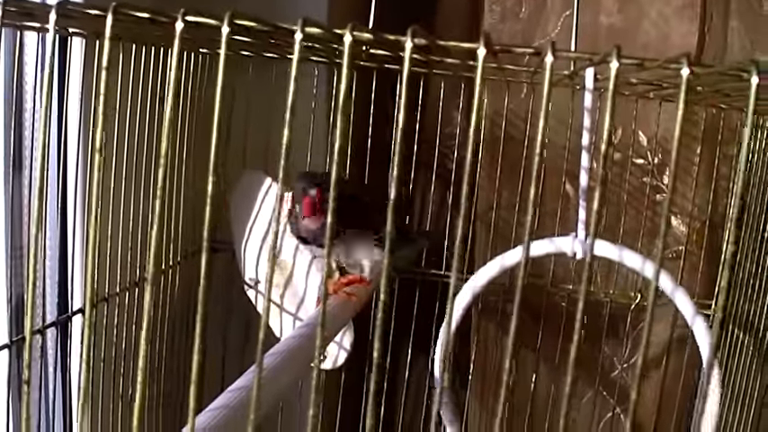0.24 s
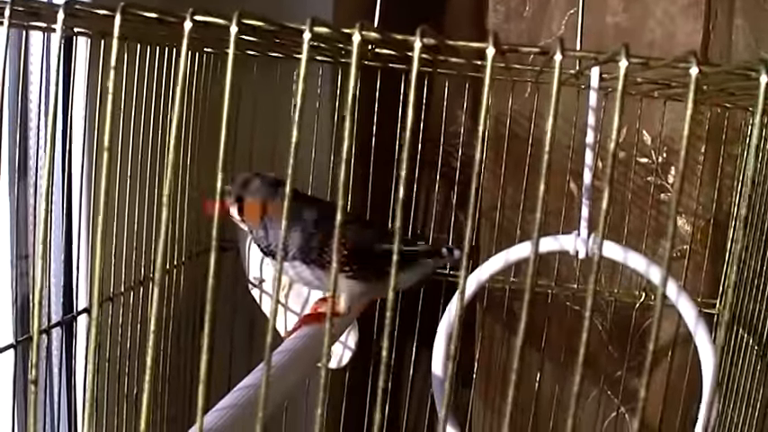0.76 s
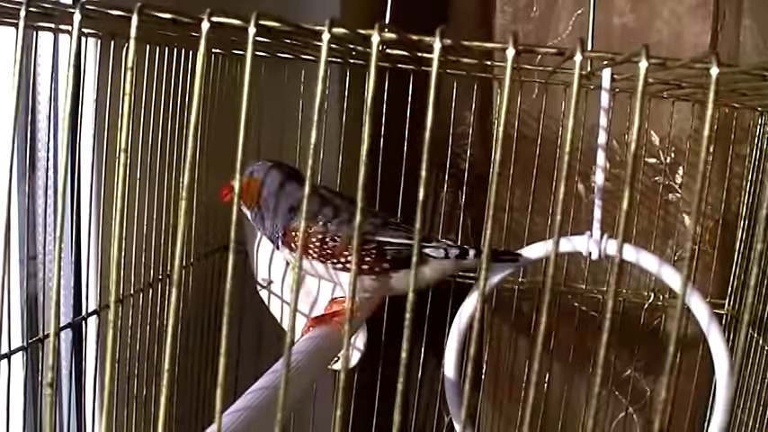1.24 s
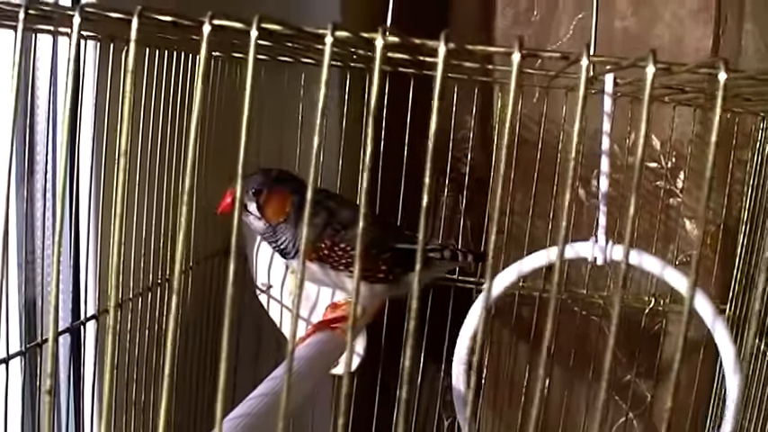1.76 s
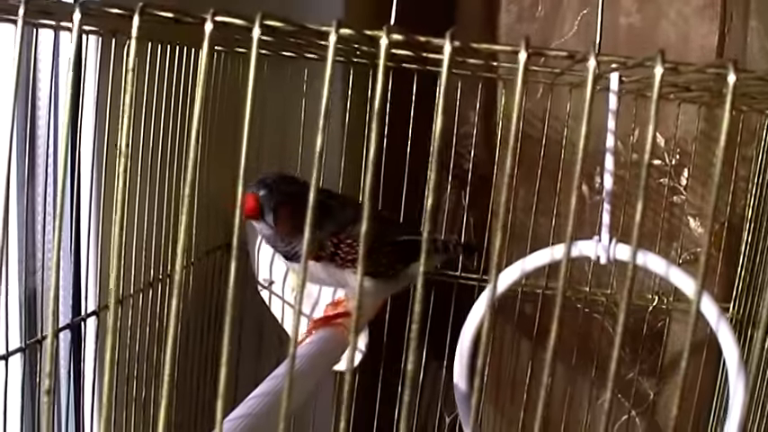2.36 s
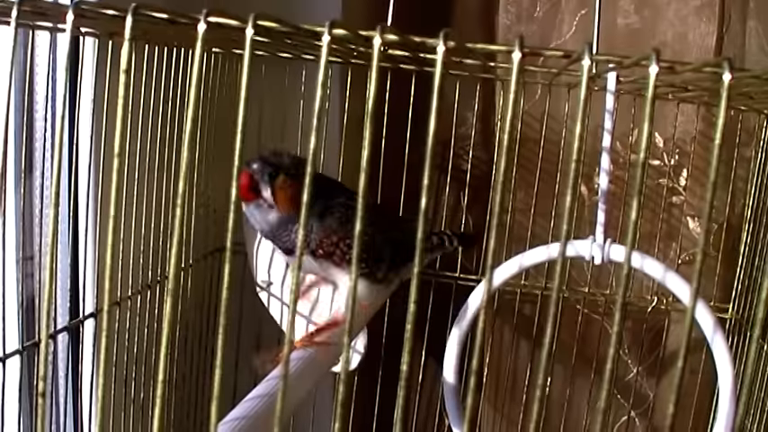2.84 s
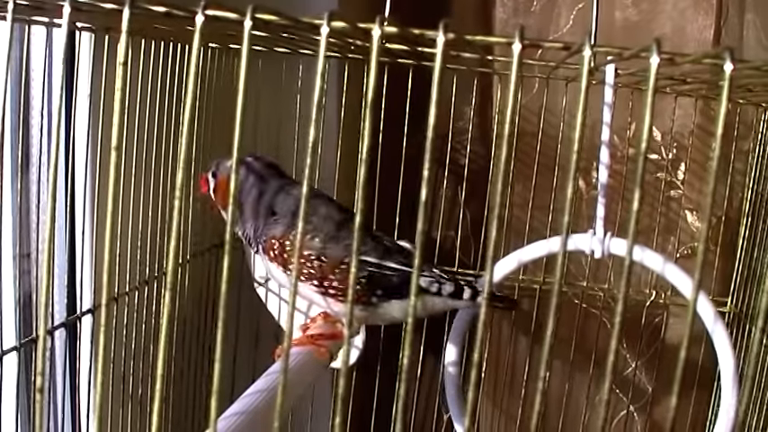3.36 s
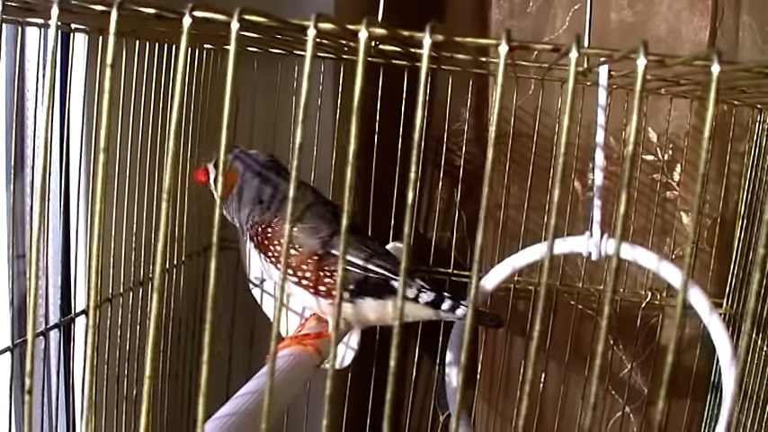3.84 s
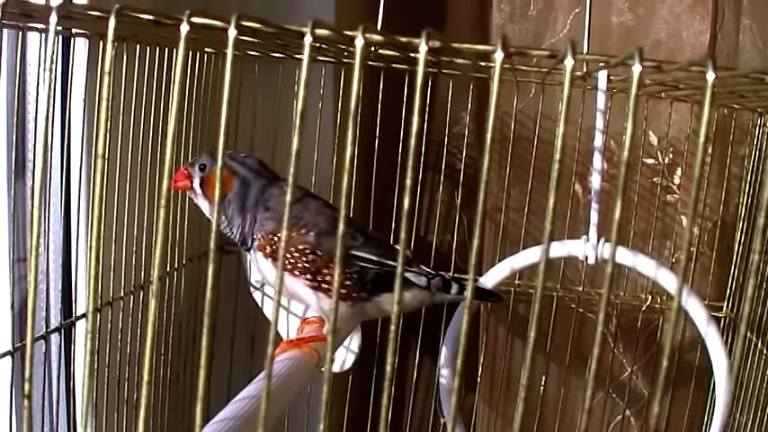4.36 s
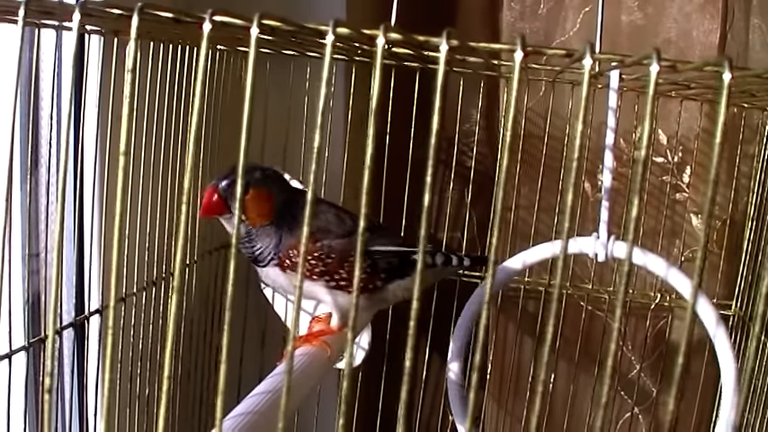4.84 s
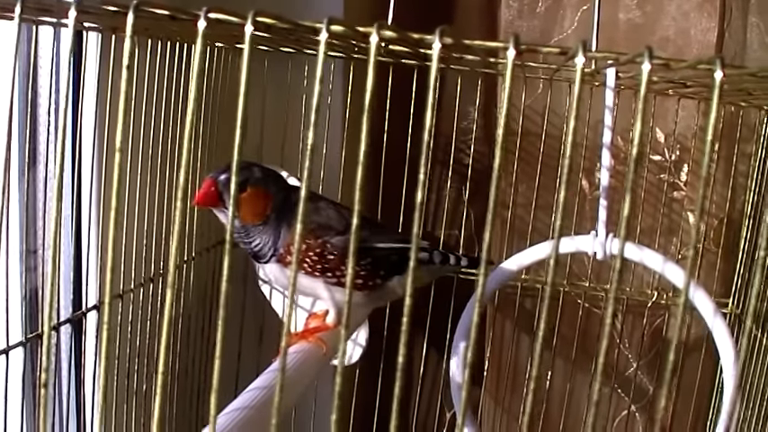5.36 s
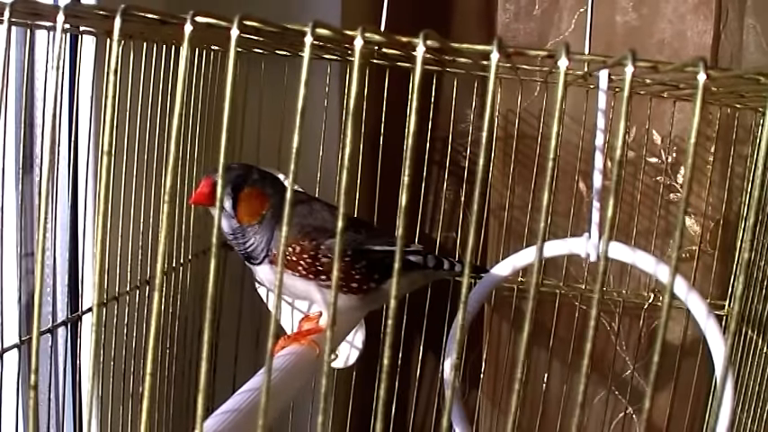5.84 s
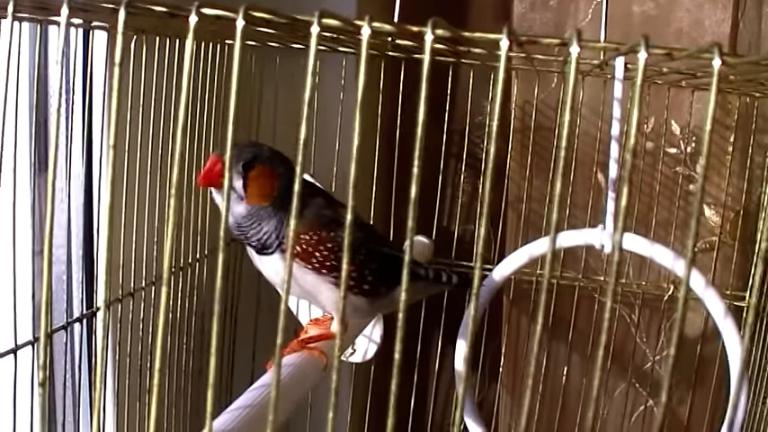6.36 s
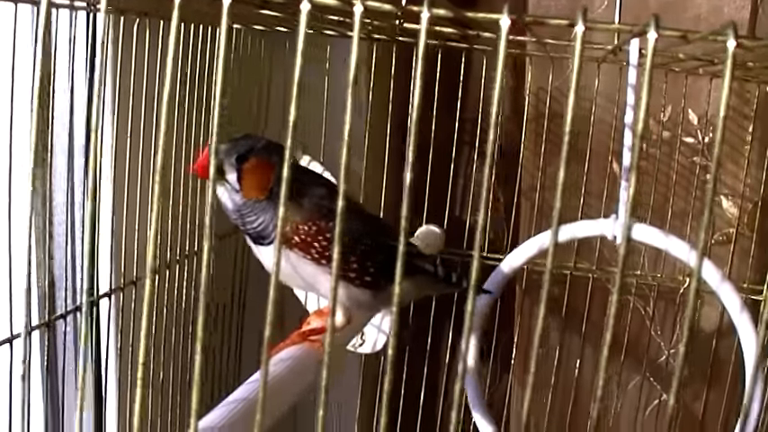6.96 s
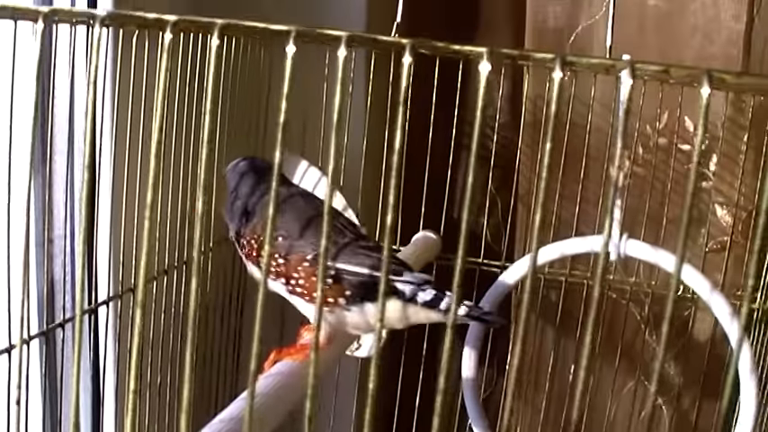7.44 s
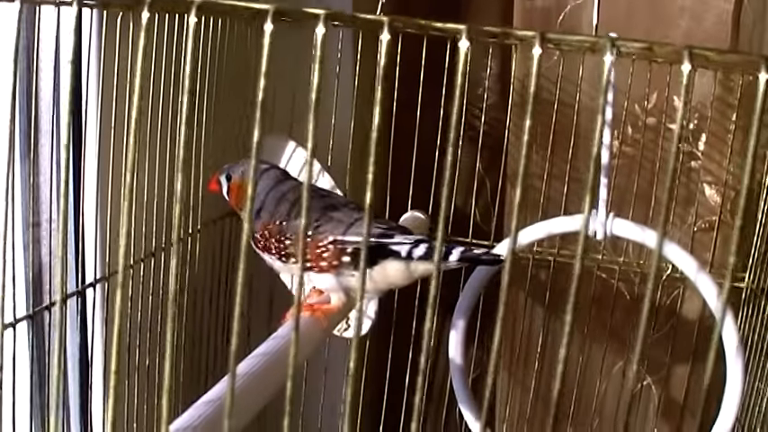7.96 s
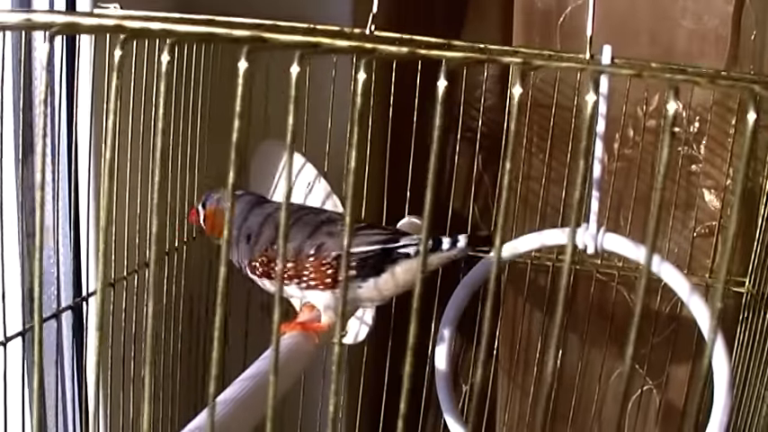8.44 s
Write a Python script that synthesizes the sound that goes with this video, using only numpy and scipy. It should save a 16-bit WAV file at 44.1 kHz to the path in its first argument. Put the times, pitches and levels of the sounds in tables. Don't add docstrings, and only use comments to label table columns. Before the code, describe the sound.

Close zebra-type finch honks like a tiny reedy toy horn, bursts into fast chattering song, calls again, then flutters and taps the cage in a quiet room.

```python
import sys
import numpy as np
from scipy import signal
from scipy.fft import rfft, irfft
from scipy.io import wavfile
from scipy.ndimage import uniform_filter1d

SR = 44100
rng = np.random.default_rng(int(sys.argv[2]) if len(sys.argv) > 2 else 0)


def to_wav(s):
    ch = np.atleast_2d(s).T
    pcm = np.round(np.clip(ch, -1, 1) * 32767)
    wavfile.write(sys.argv[1], SR, pcm.astype(np.int16))


def ratio(d):
    e = np.asarray(d, float) / 20
    return 10 ** e


N = 384111
FREQ = np.fft.rfftfreq(N, 1 / SR)


def on_log(table, hz):
    table = np.array(table, float)
    return np.interp(np.log(np.maximum(hz, 1)), np.log(table[:, 0]), table[:, 1])


def unit(x):
    return x / np.sqrt(np.mean(x ** 2))


def hump(hz, centre_hz, width_hz):
    return 1 / (1 + (2 * (hz - centre_hz) / width_hz) ** 2) ** 2


def band(count, centre_hz, width_hz):
    gain = np.sqrt(hump(np.fft.rfftfreq(count, 1 / SR), centre_hz, width_hz))
    return unit(irfft(rfft(rng.standard_normal(count)) * gain, count))


def walk(shape, rate):
    k = max(int(SR / rate), 1)
    x = uniform_filter1d(uniform_filter1d(rng.standard_normal(shape), k), k)
    return x / x.std()


def add(out, start_s, x):
    i = int(start_s * SR)
    out[i:i + len(x)] += x[:N - i]


def puffs(table, grain_db):
    out = np.zeros(N)
    for start_s, length_s, db, hz, width_hz in table:
        n = int(length_s * SR)
        swell = np.sin(np.pi * np.sqrt(np.arange(n) / n))
        crumble = ratio(grain_db * walk(n, 350))
        add(out, start_s, ratio(db) * swell * crumble * band(n, hz, width_hz))
    return out


# (time from start [s], pitch [Hz], level [dB],
# throat resonance [Hz], beak share [dB], rasp [0-1], neck [dB]).
SWEEP = [(0, 438, -24, 2900, -2.5, 0, 1.5), (.005, 556.8, -13, 2916, 4.5, 0.5, 6.5),
         (.0095, 642, -6, 3200, 4, .7, 0), (.012, 1290, -3.5, 2931, 3, 0.3, -3.5),
         (.023, 1337, -2.5, 3124, 1.5, 0.03, -5), (.042, 1382, -3, 3350, -1, 0, -7),
         (.058, 1379, -4, 3385, -3.5, 0, -6), (.069, 1354, -4, 3406, -2, 0, -6),
         (.072, 1333, -2, 3500, -6, 0.33, -5.5), (.084, 1202, -2, 3411, -9.5, .3, -7.5),
         (.090, 1135, -7, 3500, -9.5, 0.32, -10), (.105, 932, -4, 3314, -6, 0, -4),
         (.140, 720.7, -6, 3276, -8.5, .14, -2.5), (.153, 619.3, -17.5, 3414, -14, 0.3, 5)]
HOLD = [
    (0, 408, -21.5, 3800, 1.5, .2, -0.5),
    (.005, 572, -9.5, 3460, 8.5, .2, 0),
    (.0095, 640, -5, 3400, 7, .6, -3),
    (.012, 1286, 0.5, 3126, 5.5, 0.2, -6),
    (.035, 1328, -1, 3437, -4.5, 0.0015, -5.5),
    (.060, 1343, -2, 3450, 0, 0, -9),
    (.090, 1334, -2.5, 3496, -4.5, .02, -4.5),
    (.125, 1313, -3.5, 3310, -1, 0, 6.5),
]
DROOP = [
    (.148, 1271, -3, 3400, -10.5, .02, 1.7),
    (.155, 1216, -25.5, 3400, 1, 0.038, 2.6),
]
BREAK = [
    (.131, 1318, -5.5, 3400, -12, 0.044, 7.6),
    (.140, 1262, -1, 3280, -14, 0.18, 9),
    (.147, 1170, -9.5, 3500, -14, .5, 4),
    (.157, 950, -24.5, 3170, -26, 0.91, 4.9),
]
FINAL = [(0, 420.4, -22, 3800, 0, .3, -1), (.005, 570, -15, 3600, 14, 0.5, -6),
         (.012, 1261, -4.5, 3400, -4.5, 0.17, -2), (.030, 1284, -0.5, 3380, -6, 0, 4.5),
         (.042, 1308, -2, 3600, -8.5, 0, 2), (.080, 1322, 0.5, 3670, -23.5, 0, -7),
         (.118, 1307, -2.5, 3670, -18.5, 0.045, 2), (.126, 1300, -7.5, 3400, -7.5, 0, 10.5),
         (.150, 1275, -3.5, 3400, -7, .05, 8.5), (.158, 1234, -1.5, 3370, -17, 0.44, 2.5),
         (.166, 1180, -17.5, 3500, -10, 0.88, -6), (.180, 940, -28, 3200, -23, 0.83, 10)]
INTRO = [
    (0, 579.6, -19, 3250, -2, 0.66, 0.96),
    (.010, 585, -0.5, 2903, -3, 0.45, 0.99),
    (.025, 460, -2, 3000, -16.5, .15, 1),
    (.040, 372.8, -26, 2896, -16.5, 0.23, 1),
]
TET = [
    (0, 476, -10.5, 3318, -3, 0.28, 1.8),
    (.008, 500, 0.5, 3570, -3, 0.17, 1.1),
    (.020, 510.5, -0.5, 3490, -7, 0.046, 4),
    (.034, 475, -11.5, 3200, -16, .1, 4),
    (.045, 397, -24, 3464, -20, .3, 4),
]
CHIRP = [
    (0, 453, -1.5, 3240, 5, 0.37, 5.3),
    (.008, 486, -4, 3270, -4, 0.123, 2.5),
    (.018, 492, 3, 3430, -4, .04, 2.8),
    (.032, 473, -2, 3370, -5, 0.028, 3.8),
    (.040, 440, -8, 3130, -22, 0.078, 7),
    (.048, 403, -23, 3000, -15, .3, 12.3),
]
STACK = [
    (0, 423.8, -16.5, 2820, 0, 0.49, 1),
    (.012, 559, 1, 3417, -13.5, 0.183, -9),
    (.025, 577.6, 0.5, 3400, 1.5, 0.044, 1.5),
    (.058, 573.2, 1.5, 3326, -8, 0.092, -7),
    (.064, 520, -6, 3300, -24.5, .15, -1),
    (.072, 413, -15.5, 3680, -22.5, 0.4, 5.5),
]
BUZZ = [
    (0, 504.7, -3.5, 3484, -10.5, 0.3642, -28.5),
    (.006, 503.8, -1.5, 3590, -0.5, 0.202, -29.5),
    (.024, 478, -9.5, 3050, 2, .12, -21.5),
    (.030, 874, -12, 3504, 2, 0.767, 6),
    (.048, 781.5, -14, 3200, 3, 0.878, -3),
    (.051, 985.6, -12.5, 3400, 2.5, 1, -3),
    (.068, 830, -16, 3400, 0, .6, 8),
    (.082, 670, -16.5, 3310, -22.5, 0.15, 5),
    (.100, 518, -26, 2800, -28.5, 0.25, 7.5),
]
SLIDE = BUZZ[:4] + [(.050, 800.4, -12.5, 3100, 1, 1, 1), (.068, 740, -15, 3400, -1, .7, 1),
         (.082, 650, -17, 3400, -17, .15, 2), (.100, 519.7, -27, 2800, -26, .25, 0)]
VOICES = {
    "slide": (SLIDE, 5600, 7100), "sweep": (SWEEP, 4580, 6300), "hold": (HOLD, 4600, 6900),
    "break": (HOLD, 4700, 6900), "final": (FINAL, 4970, 7200), "intro": (INTRO, 5400, 7600),
    "tet": (TET, 4930, 9500), "chirp": (CHIRP, 4540, 14400), "stack": (STACK, 4686, 9700),
    "buzz": (BUZZ, 5750, 7100),
}


def sing(kind, start_s, length_s, top_hz, level_db, away_db):
    shape, clear_hz, rasp_hz = VOICES[kind]
    ending = {"hold": DROOP, "break": BREAK}.get(kind, [])
    s, hz, db, throat, beak_db, rasp, neck_db = np.transpose(shape + ending)
    attack_s = .012
    stretch = (length_s - attack_s) / (s[-1] - attack_s)
    s = np.where(s > attack_s, attack_s + (s - attack_s) * stretch, s)
    pitch = hz * top_hz / hz.max()
    throat = throat + 45.5 * away_db
    beak = clear_hz + (rasp_hz - clear_hz) * np.clip(rasp, 0, 1)
    neck_db = neck_db + 0.21 * away_db
    return np.transpose([start_s + s, pitch, db + level_db, throat, beak, beak_db - away_db, rasp, neck_db])


# (frequency [Hz], level [dB])
LEAK = [(400, -22), (1000, -17), (1600, -31), (2200, -28.5), (7000, -28.5), (8000, -27), (9000, -28.5),
        (10400, -24.5), (12000, -41), (14300, -51)]
TRACT_WIDTH_HZ = 1305


def syllable(rows, jitter=.018, shimmer_db=1.2, scatter=2.0, hiss=.015):
    s, *columns = np.transpose(rows)
    columns[1] = ratio(columns[1])
    t = np.arange(s[0], s[-1], 1 / SR)
    hz, level, throat, beak, beak_db, rasp, neck_db = (np.interp(t, s, c) for c in columns)
    hz = uniform_filter1d(hz, size=150, mode="nearest")
    glide = np.abs(np.gradient(np.log(hz))) * SR
    rasp = np.clip(rasp + np.minimum(.007 * glide, .2), 0, 1)
    order = np.arange(1, 37)[:, None]
    partial = order * hz

    power = hump(partial, throat, TRACT_WIDTH_HZ)
    power = power + ratio(2 * beak_db) * hump(partial, beak, TRACT_WIDTH_HZ)
    power = power / (1 + (1700 / partial) ** 8) / (1 + (partial / 9000) ** 12)
    power = power * ratio(.8 * np.minimum(neck_db + 12, 0) * (order % 2))
    alternate = neck_db[0] < -12
    neck_db = (neck_db + 3.5 * walk(len(t), 86)) * (partial < 1450)
    leak = ratio(2 * (on_log(LEAK, partial) + neck_db)) * (partial < 13900)
    power = power + power.max(0) * leak
    uneven_db = shimmer_db * partial / 4000 + 2.8 * np.minimum(glide / 8, 1)
    gain = np.sqrt(power / power.sum(0)) * ratio(uneven_db * walk(partial.shape, 70))

    phase = 2 * np.pi * np.cumsum(hz * (1 + jitter * rasp * walk(len(t), 600))) / SR
    noisy = rasp ** 2 * np.minimum(0.078 + partial / 3500, 1.5) ** 2 + hiss ** 2
    noisy = np.clip(noisy, 0, 1)
    smear = (walk(partial.shape, 1200) + 1j * walk(partial.shape, 1200)) / np.sqrt(2)
    turn = np.arctan(2 * (partial - throat) / TRACT_WIDTH_HZ)
    turn = turn + np.arctan(2 * (partial - beak) / TRACT_WIDTH_HZ)
    blunt = rasp * walk(partial.shape, 68) + (0.11 + 1.3 * alternate) * rng.standard_normal(order.shape)
    spin = np.exp(1j * (order * phase - 2 * turn + scatter * blunt))
    stack = (np.sqrt(1 - noisy) + np.sqrt(noisy) * smear) * spin
    voice = np.sum(gain * stack, 0)
    voice = voice / uniform_filter1d(np.abs(voice) ** 2, size=260, mode="nearest") ** .35

    edge = np.clip(np.minimum(1.5 * (t - s[0]), s[-1] - t) / .004, 0, 1)
    beat = np.cos(2 * np.pi * np.cumsum(340 * (1 + 0.17 * walk(len(t), 130))) / SR)
    flutter = 1 + .6 * rasp * np.clip((hz - 900) / 200, 0, 1) * beat
    return np.sqrt(2) * level * edge * flutter * voice.real


# (frequency [Hz], width [Hz], loss per dB of turn [dB])
SHADOW = [(2500, 1400, 0.2), (8910, 2500, 1.5), (13400, 4500, 1.1)]


def shade(x, away_db):
    hz = np.fft.rfftfreq(len(x), 1 / SR)
    lost_db = away_db * sum(loss * hump(hz, centre, width) for centre, width, loss in SHADOW)
    behind_db = max(away_db - 4, 0) * hump(hz, 2550, 1500)
    return irfft(rfft(x) * ratio(-lost_db - behind_db), len(x))


# (time [s], centre pitch [Hz], level [dB], depth of the shake [Hz])
TRILL = [
    (3.8054, 5510, -46.5, -1.5),
    (3.806, 5150, -20, -2.5),
    (3.809, 4920, -21, -6),
    (3.815, 4845, -32.5, -3.5),
    (3.817, 4766, -21, -6),
    (3.8205, 4852, -41, -5),
    (3.822, 3502, -27, 892.5),
    (3.854, 3210, -28.5, 935),
    (3.868, 3100, -33, 696),
]
TRILL_RATE_HZ = 191


def trill():
    s, *columns = np.transpose(TRILL)
    t = np.arange(s[0], s[-1], 1 / SR)
    hz, db, depth = (np.interp(t, s, c) for c in columns)
    shake = np.cos(2 * np.pi * TRILL_RATE_HZ * (t - 3.8268) + .5 * walk(len(t), 150))
    phase = 2 * np.pi * np.cumsum(hz + depth * shake) / SR
    swell = ratio(db + depth / 1000 * (6.3 * shake + 1.1 * walk(len(t), 400)))
    swell = swell * np.clip(np.minimum(t - s[0], s[-1] - t) / .0012, 0, 1)
    octave = ratio(-24.0) * (depth < 100) * np.sin(2 * phase)
    breath = ratio(-18.5) * depth / 1000 * band(len(t), 4900, 1200)
    return np.sqrt(2) * swell * (np.sin(phase) + octave + breath)


# (time [s], peak level [dB], frequency [Hz], length [s])
CLICKS = [
    (3.581, -21, 6700, 0.00203),
    (3.586, -11.5, 6080, 0.0024),
    (3.644, -23, 3460, 0.0033),
    (4.13, -26.5, 6400, .002),
    (4.1369, -10.5, 5700, 0.0018),
    (4.195, -22.5, 3530, 0.0036),
]


def clicks():
    out = np.zeros(N)
    for s, db, hz, length in CLICKS:
        n = int(2 * length * SR)
        spin = 2 * np.pi * hz * np.arange(n) / SR
        snap = np.sin(spin) + 0.13 * np.sin(.63 * spin)
        add(out, s - length, ratio(db) * np.hanning(n) ** 2 * snap)
    return out


SUNG = { "sweep": [(1.068, 0.15, 1371, -13.5, 7.5), (2.802, 0.15, 1365, -13, -0.5),
        (6.051, .156, 1361, -13.5, -1.5)], "hold": [(1.256, .137, 1344, -16, 7.5),
        (6.241, .146, 1352, -16.5, 1.5)], "break": [(2.986, .166, 1341, -16.5, -2)],
        "final": [(4.429, .180, 1325, -16, 0)], "intro": [(3.233, 0.04, 557, -30.5, 1),
        (3.325, 0.047, 563, -30, 3), (3.393, 0.036, 578, -30, 1), (3.937, 0.035, 648, -25, -4)],
        "chirp": [(.289, .048, 488.8, -25, -2.8)], "tet": [(4.365, 0.039, 516.3, -22.5, -5.5)],
        "stack": [(3.455, 0.075, 571.4, -25, 2.5), (4.002, .072, 572.7, -22, -1.5)],
        "buzz": [(3.646, .098, 988.6, -11.5, 0)], "slide": [(4.197, .101, 864, -12.5, -1.5)], }
# (time [s], length [s], level [dB], frequency [Hz], width [Hz])
WHISPERS = [(3.440, 0.01, -43, 6800, 915), (3.548, 0.076, -48, 7296, 605),
            (3.555, 0.043, -40.5, 3199, 1600), (3.618, 0.0089, -44, 6100, 908),
            (3.780, 0.0151, -55.5, 7110, 600), (3.865, 0.0132, -48.5, 863, 300.5),
            (3.224, 0.024, -48, 1060, 250), (3.313, 0.017, -48, 1110, 250),
            (3.387, 0.023, -51.5, 1097, 256), (3.913, 0.028, -49.5, 6800, 710),
            (3.928, 0.038, -47, 1230, 250), (4.098, 0.04, -41.5, 2900, 1650),
            (4.098, 0.055, -49, 7800, 1499)]


def finch():
    out = puffs(WHISPERS, grain_db=-4.0) + clicks()
    for kind, events in SUNG.items():
        for event in events:
            add(out, event[0], shade(syllable(sing(kind, *event)), event[-1]))
    add(out, TRILL[0][0], trill())
    return out


# (time [s], length [s], level [dB], frequency [Hz], width [Hz])
RUSTLES = [(0.01, 0.064, -64, 6700, 4890), (.25, 0.11, -63, 6070, 4000), (.375, 0.0096, -46, 8630, 2470),
           (.42, 0.087, -55.5, 6800, 5050), (.42, 0.15, -57, 853, 1330), (.675, 0.032, -57, 6780, 7060),
           (1.425, 0.11, -54, 870, 1460), (2.42, 0.035, -55.5, 6050, 8070), (2.43, 0.11, -58, 920, 740),
           (4.74, 0.067, -62, 7390, 4010), (7.225, 0.0763, -57, 3650, 5124), (7.615, 0.03, -58, 7410, 4010),
           (7.655, 0.091, -57, 7180, 2496), (7.655, 0.13, -53, 1115, 3750), (7.718, 0.026, -53, 7030, 4000),
           (7.82, 0.037, -61, 6090, 3870), (7.895, 0.08, -60, 7220, 2510), (7.912, 0.092, -49, 892, 2580),
           (7.96, 0.14, -57, 920, 2480), (7.975, 0.048, -62.5, 7070, 2500), (8.005, 0.02, -53, 6950, 4040),
           (8.13, 0.15, -65.5, 6100, 5940), (8.4, 0.67, -67, 5115, 7014), (8.69, 0.039, -42.5, 477, 147.8)]
# (time [s], peak level [dB])
FLICKS = [(7.598, -53), (7.6218, -46), (7.6558, -39), (7.6702, -41), (7.7203, -30), (7.8148, -55),
          (7.8229, -51), (7.9001, -39.5), (7.917, -34), (7.9903, -44), (8.004, -34)]
WIRES_HZ = [4820, 5250, 7300, 7410, 7700, 9100]


def feathers():
    flicks = [(s - .001, 0.004733, db - 14, 7180, 3700) for s, db in FLICKS]
    brush = puffs(RUSTLES + flicks, grain_db=3.0)
    ring = 1 + ratio(5.5) * sum(np.sqrt(hump(FREQ, hz, 39)) for hz in WIRES_HZ)
    return irfft(rfft(brush) * ring, N)


# (time [s], peak level [dB], body tone [Hz], crack level [dB], 60 dB decay time [s])
TAPS = [
    (7.222, -54, 2020, 24.5, 0.059),
    (7.452, -40, 723, 19.5, 0.06),
    (7.595, -34.5, 505, -7, 0.0066),
    (7.917, -47, 884, 20, 0.042),
    (8.194, -43, 770, 17.5, 0.064),
    (8.438, -68, 1983, 29.5, 0.0236),
    (8.500, -52, 346, 22, 0.039),
    (8.581, -57, 3150, 23, 0.093),
    (8.639, -24, 462, 5, 0.11),
]
CREAK_S = [6.733, 6.762, 6.785, 6.809, 6.830]


def taps():
    out = np.zeros(N)
    t = np.arange(SR // 8) / SR
    creak = [(s, -38 - 90 * (CREAK_S[-1] - s), 620, -20, .008) for s in CREAK_S]
    for s, db, hz, crack_db, t60 in TAPS + creak:
        skirt = 0.61 * band(len(t), hz, 2.0 * hz) * np.minimum(t / 0.0087, 1)
        body = np.sin(2 * np.pi * hz * t) + skirt
        crack = ratio(crack_db) * 0.14 * band(len(t), 880, 7700) * ratio(-40 * t / t60)
        add(out, s, ratio(db - 60 * t / t60) * (body + crack))
    return out


def cage():
    return signal.sosfilt(signal.butter(2, 150, "high", fs=SR, output="sos"), feathers() + taps())


# (frequency [Hz], left minus right [dB])
PORT_DB = [(400, 4.5), (2400, 4), (5000, 1.8), (14000, 3)]
# (frequency [Hz], lead [radians])
PORT_LEAD = [(300, -.2), (1200, -.4), (2200, 0), (6800, .3), (8350, .9), (9100, 1.8), (10700, 1.1),
             (14000, 1.2)]
ECHO_S = (.00110, .00113)


def at_ports(near):
    half = ratio(on_log(PORT_DB, FREQ) / 2) * np.exp(.5j * on_log(PORT_LEAD, FREQ))
    wall = 1 + ratio(-19.5) * np.exp(-2j * np.pi * np.outer(ECHO_S, FREQ))
    return irfft(rfft(near) * np.array([half, 1 / half]) * wall, N)


ROOM_T60_S, ROOM_DB, CAGE_DB = 0.31, -13, -19.5


def room(x):
    t = np.arange(SR // 2) / SR
    shared, left, right = rng.standard_normal((3, len(t)))
    own = np.array([v - uniform_filter1d(v, size=9) for v in (left, right)])
    tail = (1.0 * shared + 0.47 * own) * ratio(-60 * t / ROOM_T60_S) * np.minimum(t / 0.0023, 1)
    dull = uniform_filter1d(tail, size=4)
    tail = dull + (tail - dull) * ratio(-30 * t / ROOM_T60_S)
    near = (shared + 2.0 * own) * ratio(-60 * t / 0.038) * (t > .001)
    answer = ratio(ROOM_DB) * tail / np.linalg.norm(tail[0])
    answer = answer + ratio(CAGE_DB) * near / np.linalg.norm(near[0])
    return signal.fftconvolve(x[None], answer, axes=1)[:, :N]


# (frequency [Hz], level per Hz [dB])
AIR = [(30, -14), (50, 1), (200, -1), (400, -3.5), (900, -7.5), (1500, -12), (2500, -16), (5000, -20.5),
       (7000, -20.5), (9500, -28.5), (12500, -36.5), (15500, -40)]
# (frequency [Hz], side minus mid [dB])
AIR_SIDE = [(60, 0.5), (130, 5), (300, 5.5), (700, 5), (1400, 4), (4000, -3), (15000, -3)]
# (frequency [Hz], width [Hz], level [dB], steady core relative to the wobble)
HUM = [(138.7, 23, -64.5, 1.5), (214, 8, -72, 1), (738, 6, -80.5, 0.5), (1020, 8, -82, 2.5),
       (1090, 10, -73.5, 2.5), (1126, 8, -83.5, 1.5), (15625, .3, -94.5, 3.5), (3410, 40, -87, 1.5),
       (4000, 260, -75.5, 0), (2250, 180, -92, 2.5), (5337, 20, -95, 1), (6700, 910, -93, -0.5)]


def air():
    colour_db = on_log(AIR, FREQ)
    mid = irfft(rfft(rng.standard_normal(N)) * ratio(colour_db), N)
    side = irfft(rfft(rng.standard_normal(N)) * ratio(colour_db + on_log(AIR_SIDE, FREQ)), N)
    scale = ratio(-60.5 + 0.69 * walk(N, 2.9)) / np.std(mid)
    mid, side = mid * scale, side * scale
    for hz, width, db, steady in HUM:
        core = steady * np.sin(2 * np.pi * hz * np.arange(N) / SR)
        mid = mid + ratio(db) * (band(N, hz, width) + core)
        side = side + ratio(db - 11.0) * band(N, hz, width)
    pair = np.array([mid + side + 0.063 * mid, mid - side - 0.34 * mid])
    lean = ratio(1.4 / (1 + (FREQ / 700) ** 2))
    return irfft(rfft(pair) * np.array([lean, 1 / lean]), N)


def scene():
    near = finch() + cage()
    room_lean = ratio(np.array([[1.3], [-1.3]]))
    return at_ports(near) + room_lean * room(near) + air()


def low_pass(x):
    return signal.sosfilt(signal.butter(12, 16630, fs=SR, output="sos"), x)


def record(dry):
    x = signal.sosfilt(signal.butter(1, 25, "high", fs=SR, output="sos"), dry)
    x = signal.sosfilt(signal.ellip(10, .3, 70, 15800, fs=SR, output="sos"), x)
    return low_pass(x)


dry = scene()
out = record(dry)
to_wav(out)
```